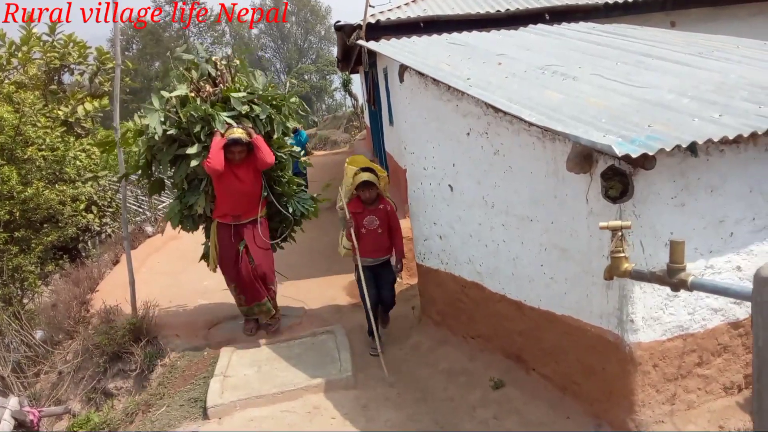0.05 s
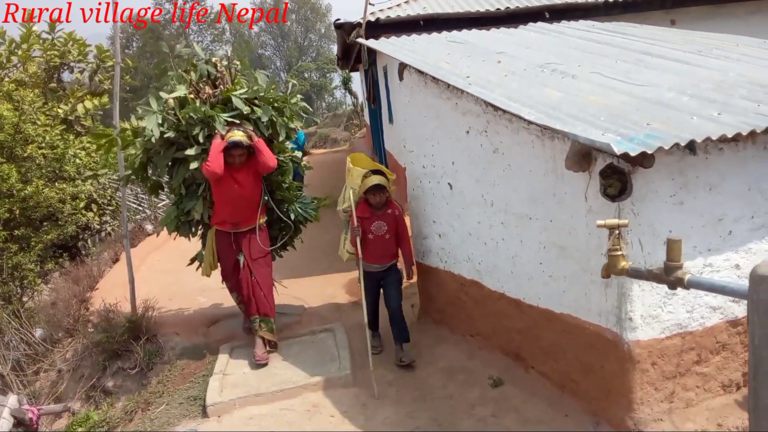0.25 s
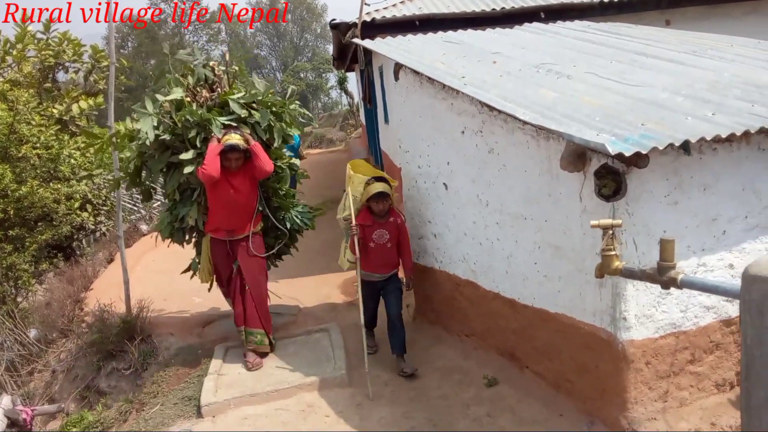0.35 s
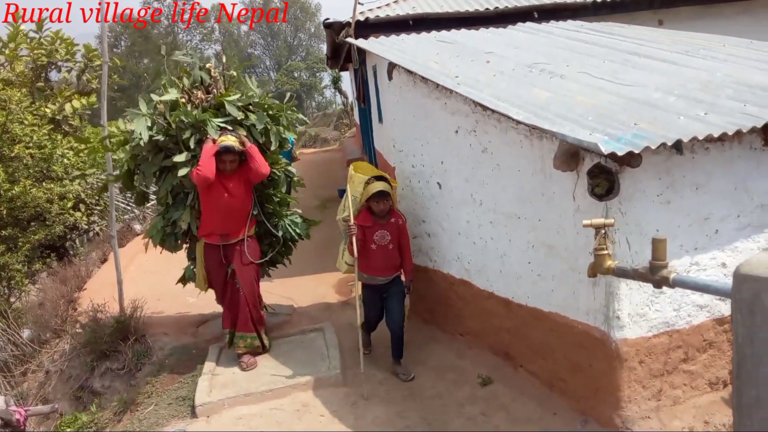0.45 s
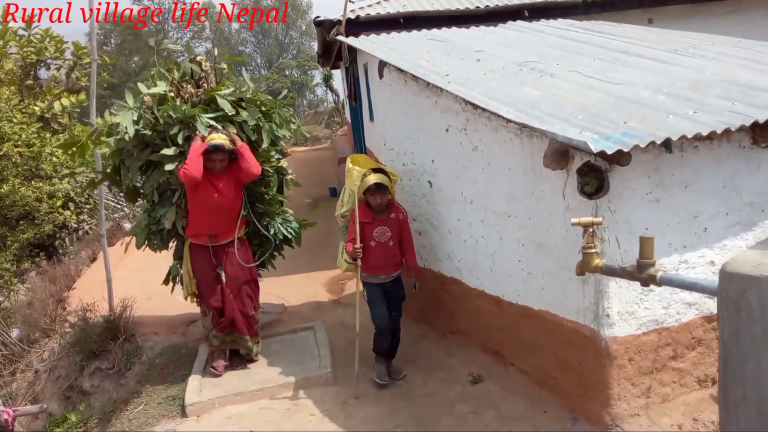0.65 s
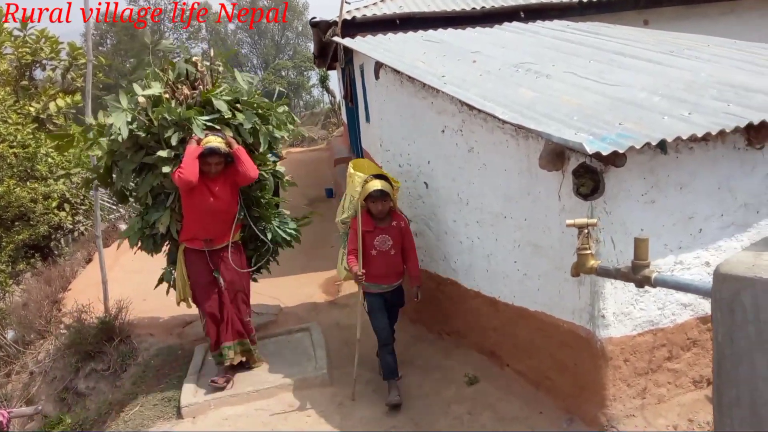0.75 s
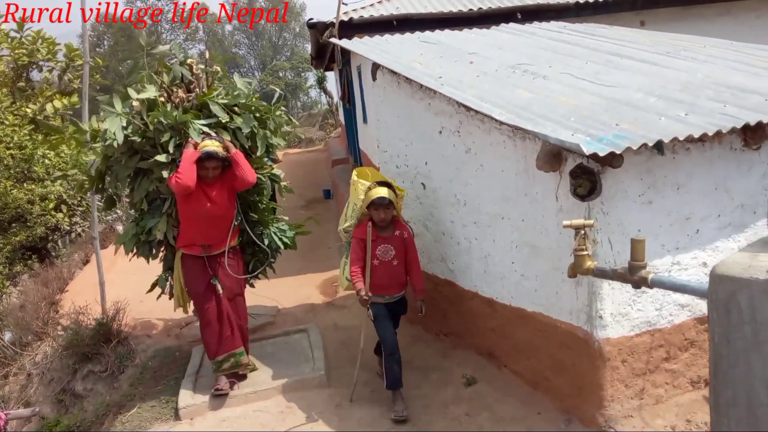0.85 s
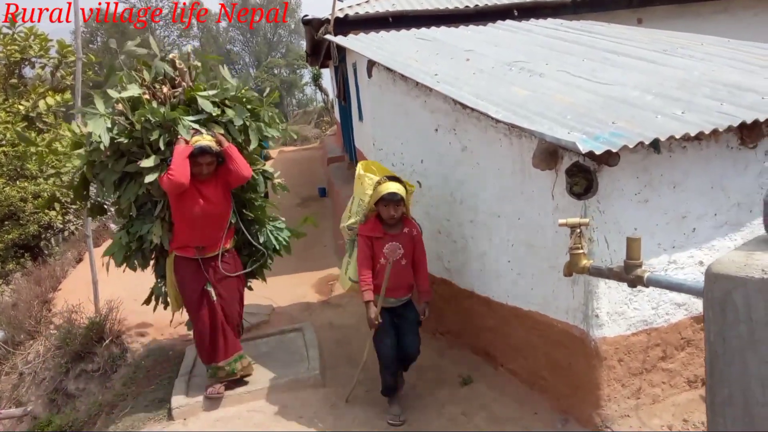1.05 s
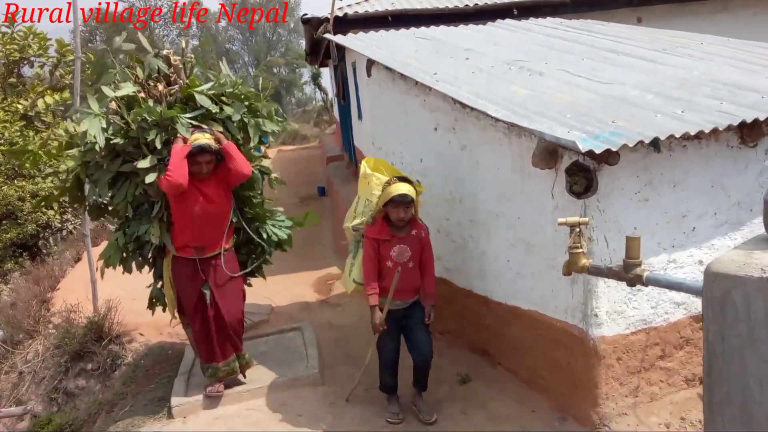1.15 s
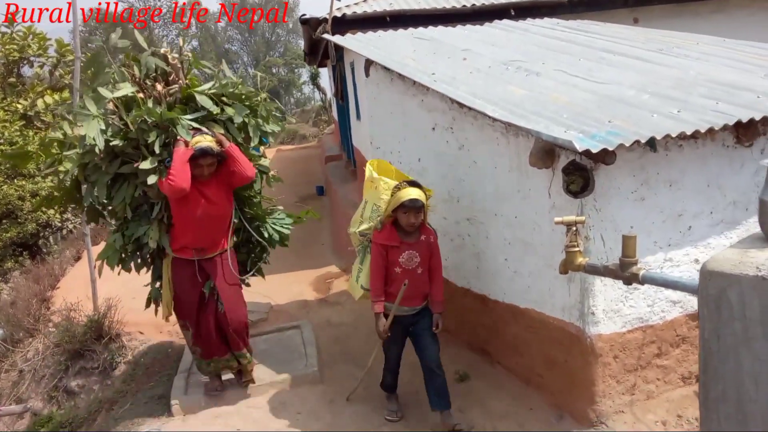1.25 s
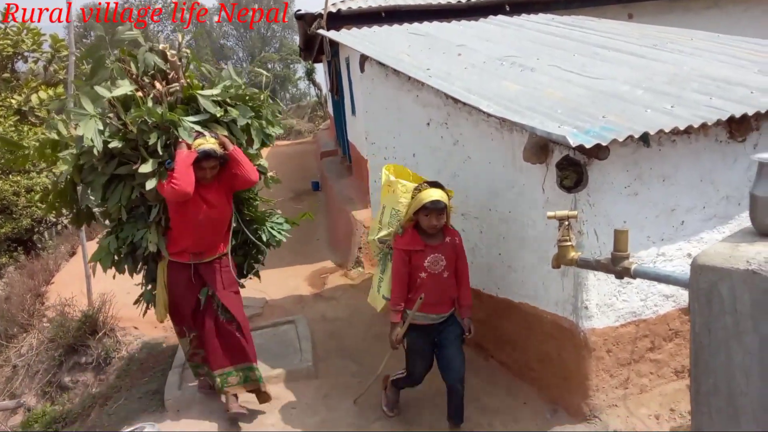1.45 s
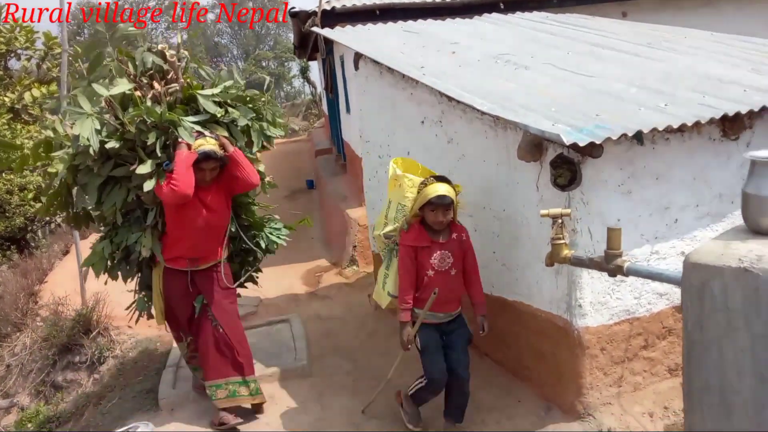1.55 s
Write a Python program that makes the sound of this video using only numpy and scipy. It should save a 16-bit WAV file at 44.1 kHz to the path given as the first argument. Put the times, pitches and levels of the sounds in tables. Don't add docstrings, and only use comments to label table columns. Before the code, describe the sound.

Goat bleating: a kid's shaky high bleat overlaps a deeper distant one, with footsteps and wind

```python
import sys
import numpy as np
from scipy import signal
from scipy.fft import rfft, irfft
from scipy.io import wavfile
from scipy.ndimage import uniform_filter1d

SR = 44100
rng = np.random.default_rng(int(sys.argv[2]) if len(sys.argv) > 2 else 0)


def generate_wav(sig):
    pcm = np.round(np.clip(np.atleast_2d(sig).T, -1, 1) * 32767).astype(np.int16)
    wavfile.write(sys.argv[1], SR, pcm)


def linear_from_db(decibels):
    return 10 ** (np.asarray(decibels, float) / 20)


N = 68355


def clock():
    return np.arange(N) / SR


def rms_one(x):
    return x / np.sqrt(np.mean(x ** 2) + 1e-20)


def even(x, seconds):
    return x / np.sqrt(uniform_filter1d(x ** 2, int(seconds * SR)) + 1e-9)


def low_pass(x, order, hz):
    return signal.sosfilt(signal.butter(order, hz, fs=SR, output="sos"), x)


def high_pass(x, order, hz):
    return signal.sosfilt(signal.butter(order, hz, "high", fs=SR, output="sos"), x)


def peak(x, hz, width_hz):
    r = np.exp(-np.pi * width_hz / SR)
    zeros = np.array([1, 0, -1]) * (1 - r * r) / 2
    poles = [1, -2 * r * np.cos(2 * np.pi * hz / SR), r * r]
    return signal.lfilter(zeros, poles, x)


def double_peak(x, hz, width_hz):
    return peak(peak(x, hz, width_hz), hz, width_hz)


def coloured(spectrum):
    hz, db = np.transpose(spectrum)
    bins_hz = np.fft.rfftfreq(N, 1 / SR) + 1
    gain = linear_from_db(np.interp(np.log(bins_hz), np.log(hz), db, left=-60.0))
    return rms_one(irfft(rfft(rng.standard_normal(N)) * gain, N))


def drift(seconds):
    size = max(int(seconds * SR), 2)
    return rms_one(uniform_filter1d(uniform_filter1d(rng.standard_normal(N), size), size))


def village_hush():
    # frequency in Hz, level in dB per Hz.
    hush_spectrum = [(22, -26), (55, 6.5), (130, -10), (400, -15.5), (1200, -18), (3500, -20.5),
                     (7500, -33.5), (15500, -28.5)]
    return linear_from_db(-58.5 + 1.0 * drift(.04)) * coloured(hush_spectrum)


def wind():
    # centre in seconds, level in dB, spread in seconds, swing in Hz, flutter in dB over the swing.
    gusts = [(.215, -44, 0.017, 65, -45), (0.256, -19.5, 0.012, 105, -12), (0.302, -38, 0.01, 98, -2),
             (0.353, -21.5, 0.014, 107, -11.5), (0.37, -24, 0.014, 131, -3),
             (0.403, -32.5, 0.014, 124, -34), (0.439, -42, 0.032, 88, -6.5),
             (0.48, -28, 0.014, 65.6, -20.5), (0.557, -40, 0.019, 79, -15),
             (0.595, -24.5, 0.009, 101, -15.5), (0.632, -31.5, 0.013, 96, -14.5),
             (0.675, -25.5, 0.0058, 119.7, -15), (0.701, -31.5, 0.013, 75, -21),
             (0.826, -35, 0.014, 112.7, -26), (0.861, -32.5, 0.0093, 70.4, -25), (0.931, -48, 0.06, 61, -8),
             (0.996, -51, 0.033, 86, 0), (1.119, -47, 0.036, 84, -8), (1.165, -40.5, 0.019, 78, -14),
             (1.230, -62.5, 0.06, 69.4, 6), (1.519, -52.5, 0.035, 65, -2)]
    t, out = clock(), np.zeros(N)
    dark = low_pass(rng.standard_normal(N), 4, 220)
    flutter_band = low_pass(high_pass(rng.standard_normal(N), 2, 216), 5, 326)
    flutter = even(flutter_band, 0.0082)
    for s, db, spread, hz, flutter_db in gusts:
        swing = even(double_peak(dark, hz, 0.53 * hz), 1.18 / hz)
        away = ((t - s) / spread) ** 2 / 2
        flutter_shape = np.exp(-away / 0.63 ** 2)
        out += linear_from_db(db) * (swing * np.exp(-away) + linear_from_db(flutter_db) * flutter * flutter_shape)
    return low_pass(out, 4, 620)


def sandals():
    contact_s = [.3995, .417, .40, .401, .880]
    # rise in seconds, hold in seconds, fall in seconds, level in dB, low edge in Hz.
    contacts = [
        (0.0002, 0.0012, 0.007, -30, 310),
        (.0005, 0.0034, 0.012, -39.5, 680),
        (0.013, 0.075, 0.022, -47, 760),
        (0.0013, 0.012, 0.027, -41, 470),
        (0.033, .035, 0.045, -35, 1750),
    ]
    # frequency in Hz, level in dB per Hz.
    sand_spectrum = [(530, -10.5), (900, -8), (1470, -12), (1860, -5), (3940, -7.5), (7860, -22),
                     (10800, -16.5), (15500, -22.5)]
    t, out = clock(), np.zeros(N)
    sand = coloured(sand_spectrum) * linear_from_db(2 * drift(0.0028))
    sole_ring = peak(sand, 2550, 550)
    slap = rms_one(sand + linear_from_db(7) * sole_ring)
    for s, (rise, hold, fall, db, low_hz) in zip(contact_s, contacts):
        decay = np.exp(-np.clip(t - s - rise - hold, 0, None) / fall * 2)
        shape = np.clip((t - s) / rise, 0, 1) * decay
        rub = slap if rise < .004 else sand
        out += linear_from_db(db) * shape * high_pass(rub, 2, low_hz)
    return out


def grit_and_stick():
    # start in seconds, level in dB, centre in Hz, length in seconds.
    ticks = [
        (.138, -88, 6000, 0.0024),
        (.154, -47, 1000, 0.003),
        (.155, -55, 9000, 0.0017),
        (0.294, -55, 1200, 0.012),
        (0.654, -52.5, 9000, .006),
        (1.145, -56.5, 8350, 0.01),
        (1.273, -62, 9050, 0.0048),
        (1.423, -58.5, 7550, 0.014),
        (1.440, -62.5, 10100, 0.0041),
    ]
    t, out = clock(), np.zeros(N)
    white = rng.standard_normal(N)
    for s, db, hz, length in ticks:
        burst = rms_one(peak(white, hz, 0.52 * hz))
        out += linear_from_db(db) * burst * (t > s) * np.exp(-np.abs(t - s) / length)
    return out


def yard(x, wet_db):
    # delay in seconds, level in dB.
    wall_echoes = [
        (.023, -9),
        (.041, -21),
        (.062, -25),
        (.087, -29),
    ]
    kick = np.zeros(int(.2 * SR))
    for s, db in wall_echoes:
        kick[int(s * SR)] = linear_from_db(db + wet_db / 3)
    tail_db = -48 + wet_db - 400 * np.arange(len(kick)) / SR
    tail = rng.standard_normal(len(kick)) * linear_from_db(tail_db)
    dull = low_pass(kick + tail, 1, 1800)
    return x + signal.fftconvolve(x, dull)[:N]


def goat(puffs, mouth_db, hoarse_db, rise, fall, arch, throat, jitter):
    t = clock()
    s, db, hz = np.transpose(puffs)
    lag = t - s[:, None]
    away = np.where(lag < 0, lag / rise, lag / fall)
    near = np.argmin(np.abs(away), axis=0)

    lead, climb, climb_s, sag, sag_s = arch
    past = t - s[near] + lead
    climbing = climb * np.minimum((past / climb_s) ** 2, 1.5)
    sagging = sag * np.minimum((past / sag_s) ** 2, 1.2)
    bend = np.where(past < 0, climbing, sagging)
    phase = 2 * np.pi * np.cumsum(hz[near] * (1 - bend + jitter * drift(0.0048))) / SR

    pulses = rms_one(-sum(np.cos(k * phase) / (1 + (k * hz.mean() / 5000) ** 3) for k in range(1, 33)))
    plateau = 2.8
    voice = (linear_from_db(db)[:, None] * np.exp(-np.abs(away) ** plateau)).sum(axis=0)
    shimmer = linear_from_db(.8 * drift(.003))

    def breath_lobe(at):
        return np.exp(-((lag - at) / .012) ** 2 / 2)

    breath = breath_lobe(.012) + linear_from_db(-7) * breath_lobe(-.034)
    air = (linear_from_db(db + hoarse_db)[:, None] * breath).sum(axis=0)
    hiss = low_pass(rng.standard_normal(N), 2, 5500)
    gate = (1 + .6 * np.cos(phase)) * 2
    source = voice * pulses * shimmer + air * hiss * gate

    opening_db = np.array(mouth_db)[near]
    out, plain = np.zeros(N), np.zeros(N)
    for f, width, gain_db, share in throat:
        out += linear_from_db(gain_db + share * opening_db) * double_peak(source, f, 1.33 * width)
        plain += linear_from_db(gain_db) * double_peak(pulses, f, 1.33 * width)
    return out / np.std(plain)


def doe():
    # peak in seconds, level in dB, pitch in Hz.
    doe_puffs = [
        (.975, -47, 205),
        (1.085, -44, 220.6),
        (1.180, -42, 256.2),
        (1.278, -44.5, 259.4),
        (1.372, -43.5, 266.7),
        (1.470, -45, 256.3),
    ]
    # resonance in Hz, width in Hz, level in dB, share of the mouth opening.
    doe_throat = [(723, 81, 6.5, 1.0), (260, 303, 7, 0.078), (472, 114, -1, .1), (889, 33, 6, 1),
                  (1512, 1030, -7, 0.65), (2204, 182, 0, 1), (3220, 294, 2.5, 0.56), (4230, 200, -21, 0.5),
                  (5370, 260, -16, 0.37)]
    # mouth opening in dB, one for each puff.
    doe_mouth_db = [-17, -6, -8, 3.5, 5, 6]
    # breath against voice in dB, one for each puff.
    doe_hoarse_db = [-9, -11, -12, -11, -11, -11]
    # pitch top ahead of the peak in seconds, climb share, climb in seconds, sag share, sag in seconds.
    doe_arch = (-.004, .08, .05, .11, .02)
    voice = goat(doe_puffs, doe_mouth_db, doe_hoarse_db, rise=.034, fall=.022,
                 arch=doe_arch, throat=doe_throat, jitter=.005)
    return yard(voice, 9.0)


def kid():
    # peak in seconds, level in dB, pitch in Hz.
    kid_puffs = [
        (.500, -40.5, 419.7),
        (.582, -37.5, 445.7),
        (.678, -33, 459.7),
        (.773, -31.5, 460),
        (.869, -30.5, 466),
        (.975, -30.5, 459.6),
        (1.070, -30.5, 452.4),
        (1.182, -33, 426),
    ]
    # resonance in Hz, width in Hz, level in dB, share of the mouth opening.
    kid_throat = [(958, 131, -2, 0.91), (460, 160, -18.5, 0.93), (1280, 750, -8, 0.37),
                  (1735, 224, -13, 0.0), (2332, 244, -4, 0.27), (2650, 100, -5.5, 1), (3235, 67, -0.5, 1),
                  (3674, 122, 4, 0.42), (4280, 1150, -4.5, 0.36), (5350, 940, -18.5, 0),
                  (6940, 680, -15, 0.65), (9400, 630, -15.5, .8), (10600, 920, -16, 0.31),
                  (14000, 600, -32, .8)]
    # mouth opening in dB, one for each puff.
    kid_mouth_db = [-22, -15, -1, 0, 0, 0, 0, -3]
    # breath against voice in dB, one for each puff.
    kid_hoarse_db = [-14, -4.5, -6, -7.5, -6, -13, -8, -8.5]
    # pitch top ahead of the peak in seconds, climb share, climb in seconds, sag share, sag in seconds.
    kid_arch = (.018, .035, .026, .05, .034)
    voice = goat(kid_puffs, kid_mouth_db, kid_hoarse_db, rise=.03, fall=.013,
                 arch=kid_arch, throat=kid_throat, jitter=.004)
    return yard(voice, 0.0)


def scene():
    background = village_hush() + wind()
    feet = sandals() + grit_and_stick()
    return (background + feet + doe() + kid())[None]


def band_limit(x):
    return signal.sosfilt(signal.butter(12, 16490, fs=SR, output="sos"), x)


def record(dry):
    top_cut = signal.cheby2(12, 70, 16300, fs=SR, output="sos")
    mix = signal.sosfilt(top_cut, dry)
    return band_limit(mix)


dry = scene()
out = record(dry)
generate_wav(out)
```